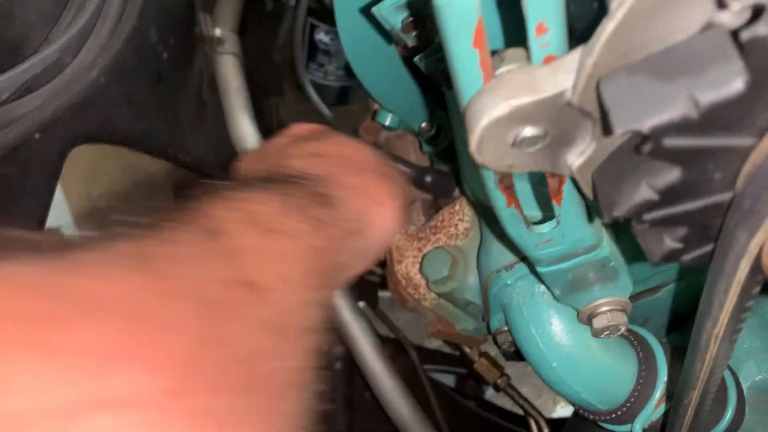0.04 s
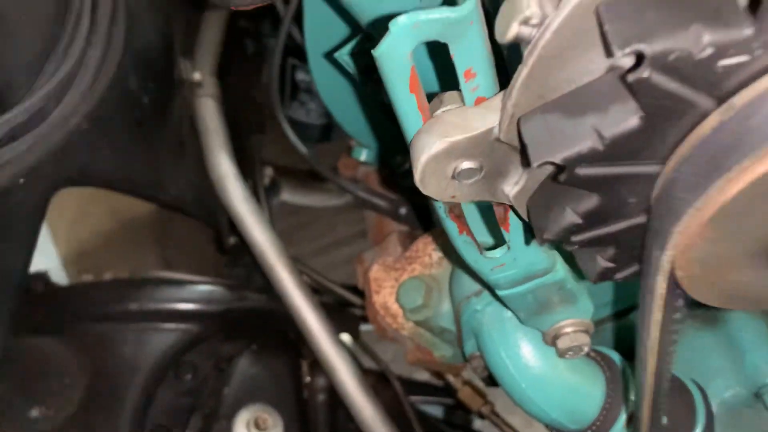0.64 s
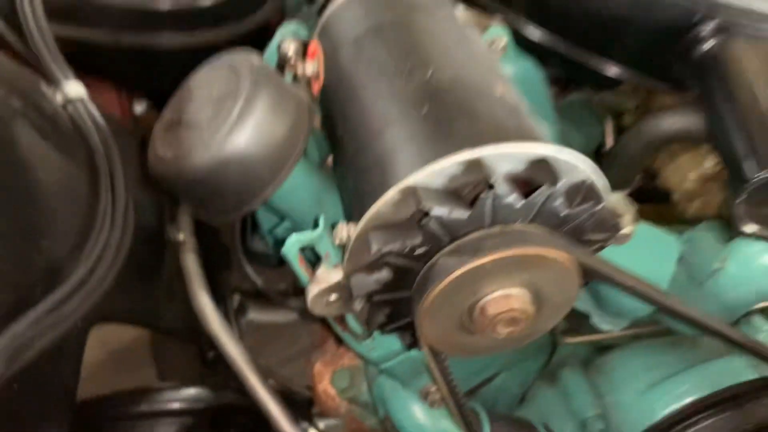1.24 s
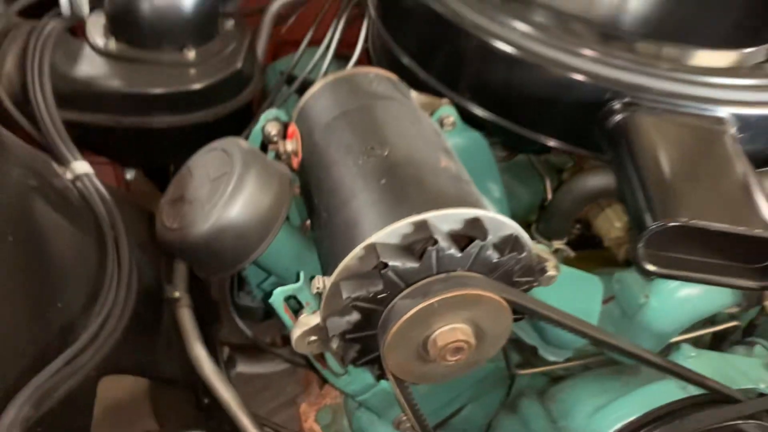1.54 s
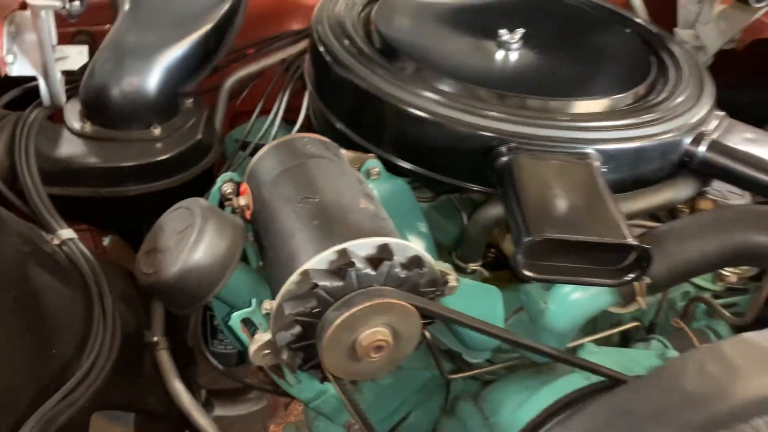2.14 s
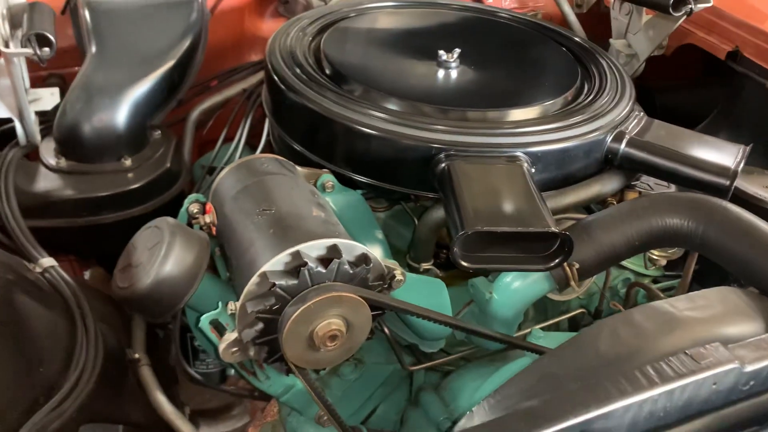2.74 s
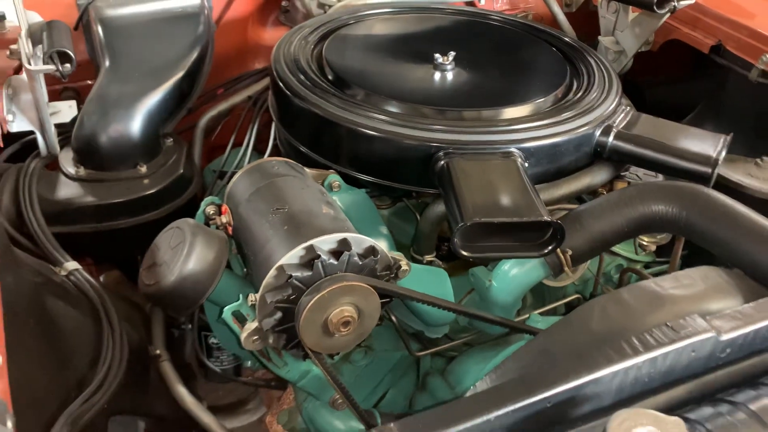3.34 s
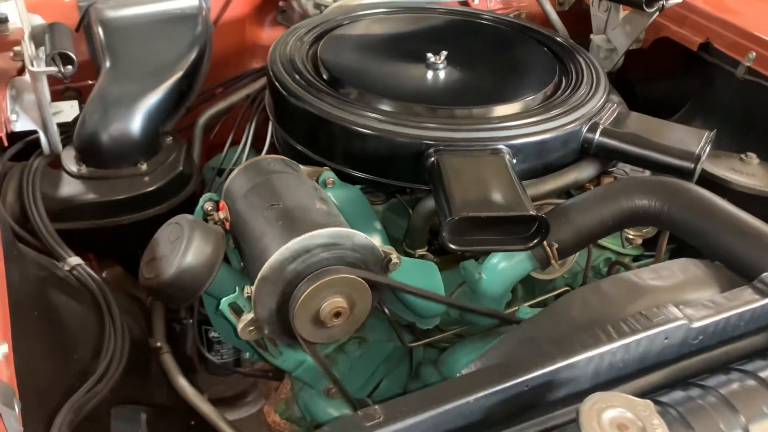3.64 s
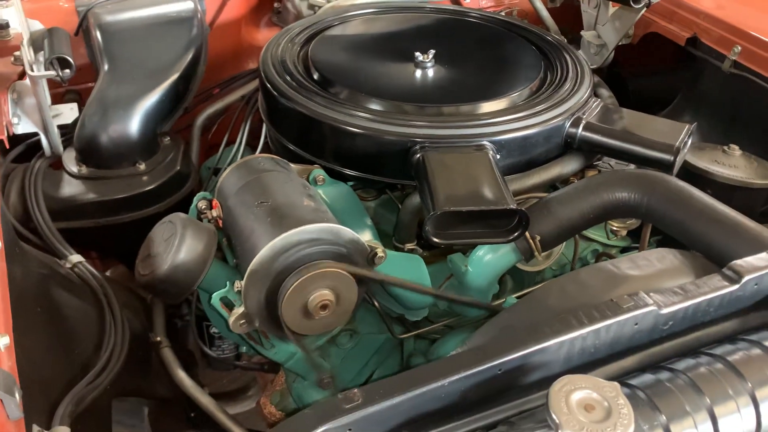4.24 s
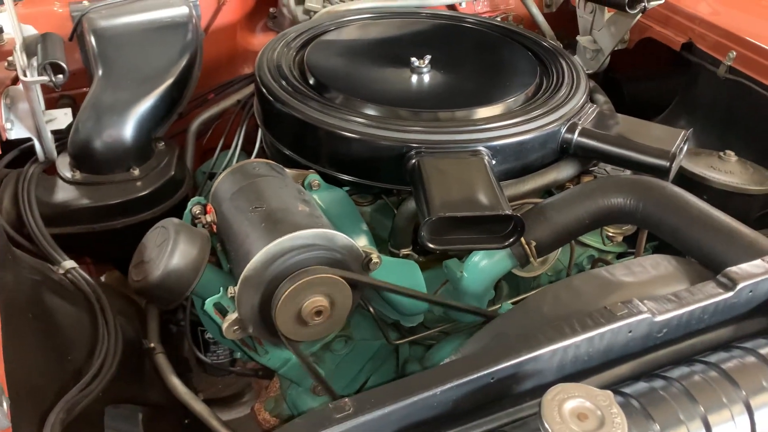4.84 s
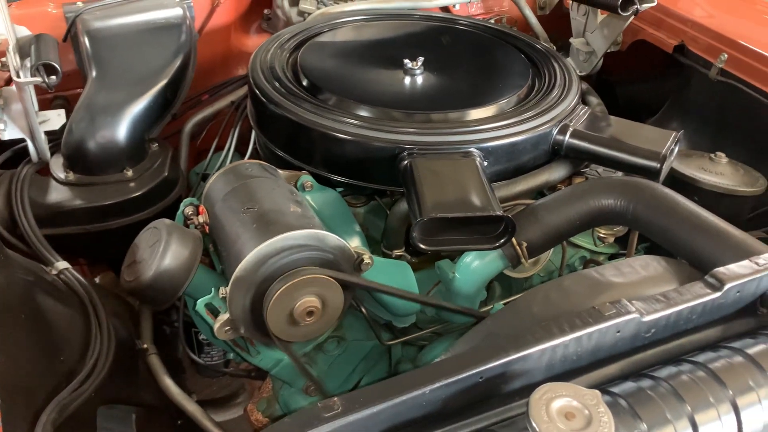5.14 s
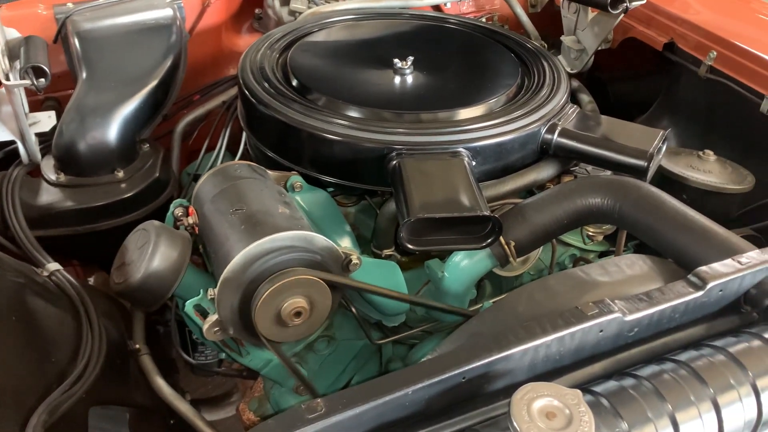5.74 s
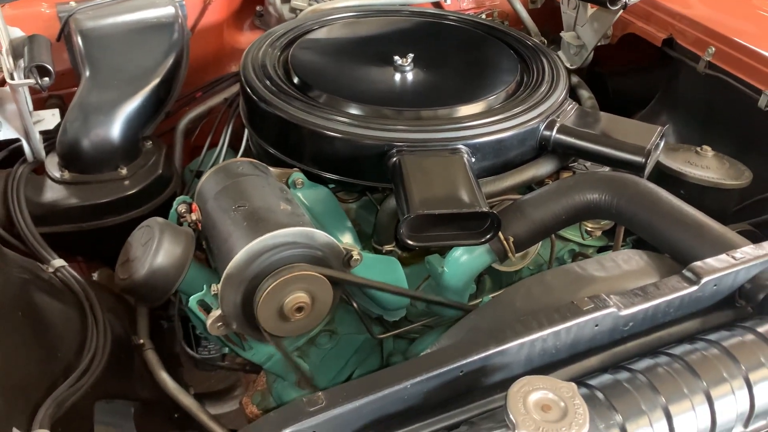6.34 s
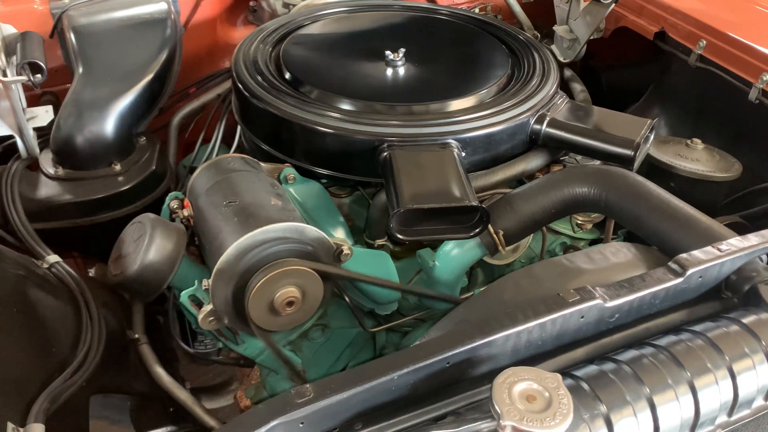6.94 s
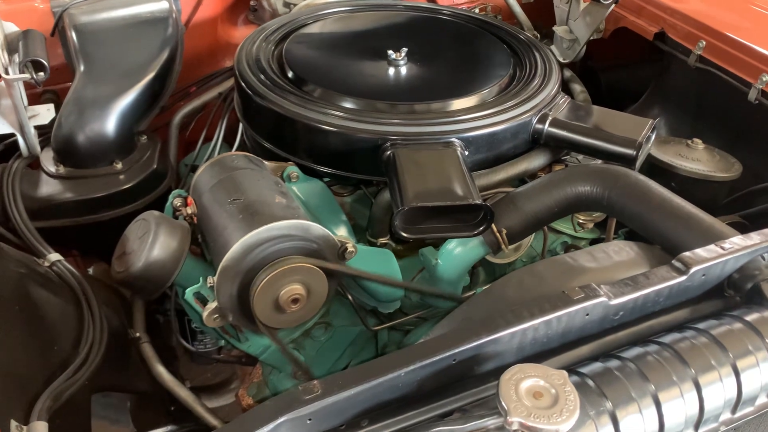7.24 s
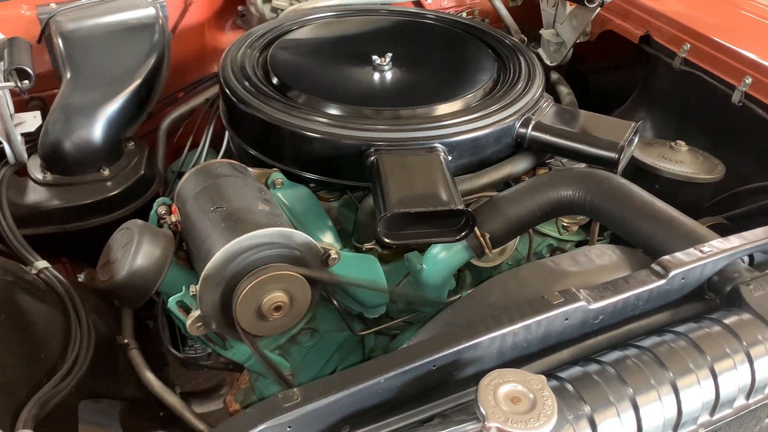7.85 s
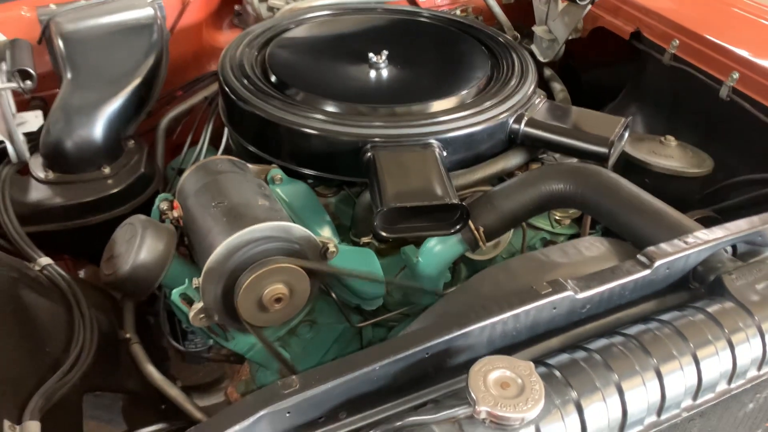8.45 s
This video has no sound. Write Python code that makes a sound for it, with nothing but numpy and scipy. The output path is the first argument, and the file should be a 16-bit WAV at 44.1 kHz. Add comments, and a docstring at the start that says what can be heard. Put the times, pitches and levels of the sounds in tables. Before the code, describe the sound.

Small metal clicks over a low hum, then a starter grinds and an old car engine fires up, idles and revs three times.

```python
"""A low garage hum, then clicks, knocks and faint squeaks from the door and controls of an old V8 car.
From above the open bonnet we hear the starter's teeth grind for under a second; the engine catches,
settles to a lumpy idle and is revved three times. One crankshaft and one throttle drive its layers:
firings shake the block, valve gear clatters, air hisses and snarls into the carburettor, and the
exhaust booms through the tailpipe. The throttle rods tap lightly during the idle."""
import sys
import numpy as np
from scipy import signal
from scipy.fft import rfft, irfft, next_fast_len
from scipy.io import wavfile
from scipy.ndimage import uniform_filter1d, map_coordinates

SR = 44100
rng = np.random.default_rng(int(sys.argv[2]) if len(sys.argv) > 2 else 0)


def pcm_store(signal):
    """Save signal as 16-bit PCM."""
    levels = np.round(np.clip(np.atleast_2d(signal), -1, 1) * 32767)
    wavfile.write(sys.argv[1], SR, levels.astype(np.int16).T)


N = 384111
TIME = np.arange(N) / SR

# room tone: rumble and air spectra, and the hum's tones (frequency [Hz], level [dB])
RUMBLE_EQ = [(12, -64), (20, -22), (36, -21.5), (59, -2), (75, -5), (91, -16.5), (134, -3.5), (166, -17.5),
             (315, -27.5), (400, -48), (520, -46.5), (880, -120)]
AIR_EQ = [(150, -21), (250, 0.5), (450, 4), (700, -2.5), (1100, -6.5), (1500, -9.5), (2000, -10.5),
          (2350, -11.5), (2900, -17), (4000, -19.5), (6000, -33.5), (16000, -29.5)]
HUM_TONES = [(59.2, -52), (134.6, -56)]
# reverb of the garage walls (frequency [Hz], t60 [s])
WALL_DECAY = [(100, 0.7), (500, 0.7), (2500, 0.3), (7000, 0.36), (15000, 0.18)]
# stereo width (frequency [Hz], side against mid [dB])
STEREO_WIDTH = [(60, -18.5), (200, -11.5), (380, -9.5), (700, -3), (2400, -1.5), (5000, -1.5),
                (8000, -25.5), (15000, -25)]
# two microphone ports hear the treble out of step (frequency [Hz], left's lead [rad])
PORT_PHASE = [(300, 0), (950, 0.73), (1900, -1.1), (3000, 2.17), (4200, 0.33), (5200, -3), (6700, 1),
              (8500, -4), (11000, -5.5), (13400, -10), (15500, -11.5)]

# cloth, seat and pedal scuffs (time [s], length [s], rub [dB], hollow body [dB])
SCUFF_CUES = [(-.2, 0.76, -76, -60.5), (0.31, 0.059, -57, -59), (0.556, 0.18, -58.5, -59),
              (1.965, 0.7, -66, -60), (2.35, 0.092, -49, -52), (2.39, 0.44, -63, -59),
              (3.113, 0.39, -60, -59), (3.374, 0.21, -52.5, -67)]
# metal contacts of latch, key, starter drive and linkage, and little puffs of intake air during the idle #
# (time [s], level [dB], body against snap [dB], rise [s], t60 [s])
CLICK_CUES = [(0.326, -48.5, -5, 0.014, 0.1), (1.945, -57, 8, 0.0073, 0.13),
              (1.998, -52.5, 4, 0.0099, 0.22), (2.081, -37, -24, 0.0017, 0.07),
              (2.099, -45, -15, .0017, 0.045), (2.278, -45.5, 1, 0.0017, 0.071),
              (2.32, -52.5, -3, 0.005, 0.15), (2.353, -33.5, -23, 0.0033, 0.09),
              (2.364, -23, -5, 0.0024, 0.086), (2.436, -47.5, 10.5, .002, 0.14),
              (2.553, -35, -1.5, 0.0013, 0.086), (2.701, -66, -2, .002, 0.068),
              (3.145, -48.5, 4, 0.0018, 0.21), (3.283, -67, -9, 0.0019, 0.052),
              (3.505, -19.5, -11, 0.019, 0.15), (4.023, -26.5, -8, 0.0079, 0.11),
              (4.12, -19, -16, 0.0041, 0.13), (5.2, -37.5, -10, 0.0069, 0.18), (5.335, -49, -23, .006, .12),
              (5.435, -36.5, -17, 0.009, 0.11)]
# dull bodywork knocks (time [s], level [dB], t60 [s])
KNOCK_CUES = [(0.336, -41, 0.047), (2.063, -44.5, 0.086), (2.433, -29, 0.086), (3.348, -37.5, 0.089),
              (3.386, -39.5, 0.023), (3.522, -30, 0.15)]
# struck parts, from metal ping to body thud (time [s], level [dB], frequency [Hz], t60 [s])
RING_CUES = [(0.338, -37.5, 1100, 0.1), (2.065, -45, 300, .15), (2.083, -38, 3855, 0.054),
             (2.436, -33, 640, 0.089), (2.556, -38, 290, 0.24), (2.556, -36.5, 6870, 0.042),
             (3.372, -23, 70, 0.085), (3.379, -38, 175, 0.065), (3.52, -24.5, 680, 0.22),
             (3.533, -21, 218, 0.2), (3.545, -28, 1005, .2), (3.55, -27, 131, 0.14), (3.586, -32, 242, .15),
             (4.118, -24.5, 522, 0.24), (4.12, -23.5, 4200, 0.28)]
# thin squeaks (time [s], length [s], frequency [Hz], level [dB])
SQUEAK_CUES = [(.8, 0.23, 2330, -70), (1.08, .1, 4000, -74), (1.35, .25, 2320, -70), (1.68, .1, 3980, -76),
               (1.737, 0.13, 2450, -68), (2.6, .15, 4180, -66), (2.728, 0.089, 2230, -60),
               (2.728, 0.14, 3300, -63), (2.76, .1, 4000, -72), (2.87, 0.095, 2220, -62),
               (2.92, .05, 2490, -62), (2.917, .09, 3330, -67), (3, 0.13, 2620, -58)]
# colour of scuff, click and knock (frequency [Hz], level [dB])
RUB_EQ = [(400, -13), (1200, 3), (2600, 4), (4000, -2.5), (6000, -8), (11000, -12), (16000, -11)]
SNAP_EQ = [(300, -22), (1000, 1.5), (2200, -2.5), (4000, 0.5), (7000, 1), (11000, -1.5), (16000, -3.5)]
KNOCK_EQ = [(80, 3.5), (200, 1), (290, 2.5), (430, 9), (600, 6), (900, -6.5), (1500, -10.5), (2500, -13),
            (8000, -41)]
# ring of latch and key, and of the body panels (frequency [Hz], width [Hz], level [dB])
LATCH_MODES = [(4480, 60, -2), (5835, 52, 2), (6260, 65, -2), (6830, 52, 7), (9900, 94, 7.5)]
PANEL_MODES = [(268.3, 6.4, 12.5), (429, 13.4, -3.5), (648, 28, -5.5), (880, 12, 2), (1034, 19, 5.5),
               (1242, 16, -2), (1800, 30, -3)]

# the starter labours at each compression (time [s], tooth rate [Hz], growl [dB], grind [dB])
CRANKING_CURVE = [(3.5, 183, -22.5, -28), (3.6, 235, -25.5, -31), (3.69, 270, -27, -23.5),
                  (3.745, 259, -26, -22), (3.81, 227, -27.5, -28), (3.895, 265, -28.5, -24),
                  (3.99, 219, -28, -29.5), (4.06, 290, -32.5, -21.5), (4.12, 280, -31.5, -25),
                  (4.2, 323, -27, -25.5), (4.29, 370, -34, -26), (4.33, 330, -39.5, -30)]
# colour of the gears' low growl and bright grind (frequency [Hz], level [dB])
GROWL_EQ = [(35, -25), (62, 6.5), (85, 0), (130, -5), (210, 4), (280, 2), (400, -18), (550, -6.5),
            (800, -8), (1100, -8.5), (2000, -32), (5000, -64)]
GRIND_EQ = [(600, -34), (1200, -3.5), (1900, -5), (2500, 3), (3100, 4), (4500, 0.5), (5400, -7), (7000, -7),
            (10000, -8.5), (16000, -17.5)]
# gear whine (multiple of the tooth rate [x], level [dB])
WHINE_ORDERS = [(1, 0.5), (1.5, -10), (2, -6), (2.5, 1.5), (3, 3.5), (3.5, -4), (4, -13), (5, -12), (6, -4),
                (7, -2.5), (9, -9), (10, -7), (13, -1), (16, 0)]
# ring of the starter's bell housing (frequency [Hz], width [Hz], level [dB])
HOUSING_MODES = [(282.7, 13, 8.5), (557.5, 16, 10.5), (690, 16, 8.5), (752, 24, 3), (811, 26, 8),
                 (888, 17, 8), (1420, 38, -2.5), (1567, 40, 2.5), (1854, 38, 15), (2300, 26, 2),
                 (2493, 19, 14), (2610, 40, 7), (2870, 45, -6), (3600, 66, 5), (4110, 97, 5),
                 (4690, 40, -1), (6240, 49, 1), (9980, 110, 15)]

# engine speed, four firings to a crank turn (time [s], firing rate [Hz])
SPEED_CURVE = [(4.25, 87.9), (4.48, 63.66), (4.58, 51.03), (4.8, 47.42), (5.13, 45.2), (5.35, 49.77),
               (5.99, 53.4), (6.12, 89.04), (6.23, 101.6), (6.39, 87.62), (6.61, 59.12), (6.75, 93.68),
               (6.89, 142.9), (7.0, 136.1), (7.17, 104.8), (7.34, 87.94), (7.69, 51.06), (7.8, 68.13),
               (7.96, 129.8), (8.07, 156.2), (8.15, 164.3), (8.3, 141.6), (8.47, 107.7), (8.71, 92.3)]
# gulps of mixture: two at the catch, a short surge, the pedal easing open, three blips (time [s],
# air rise [s], burn rise [s], length [s], fall [s], hiss [dB], roar [dB], snarl [dB], exhaust [dB])
THROTTLE_CUES = [(4.11, 0.065, 0.066, 0.2, 0.03, -20.5, -37, -50, -34),
                 (4.33, 0.042, 0.033, 0.073, 0.028, -25.5, -37, -43, -44),
                 (4.5, 0.05, 0.079, 0.13, 0.14, -40, -37.5, -49, -29.5),
                 (5.76, 0.05, 0.17, 0.36, 0.058, -34, -41, -36.5, -27.5),
                 (5.96, 0.046, 0.064, 0.13, 0.29, -26.5, -28, -31, -23.5),
                 (6.531, 0.2, 0.27, 0.31, 0.18, -25, -26, -24, -20),
                 (7.645, 0.29, .26, 0.42, 0.18, -23.5, -27.5, -26, -27.5)]
# colour of the block and the valve gear (frequency [Hz], level [dB])
BLOCK_EQ = [(100, -31), (170, 3), (230, 0.5), (310, 2), (360, -2.5), (420, 0), (620, -3.5), (850, -3.5),
            (1100, -17.5), (2000, -24), (4000, -52)]
CLATTER_EQ = [(500, -47), (900, 3.5), (1300, 0.5), (1900, -0.5), (2400, -2.5), (2900, -3.5), (3900, -4.5),
              (5200, -5.5), (8000, -4), (16000, -82)]
# pitched lines of the running engine (multiple of the firing rate [x], level [dB])
ENGINE_ORDERS = [(.75, -4), (1.5, 0), (2, -6), (2.5, -7.5), (3, -5.5), (3.5, -9), (4, -8), (4.5, -13),
                 (5, -9), (6, -9), (7, -17.5), (8, -13.5)]
# ring of the engine covers; pipe and air cleaner peaks that lift the orders gliding through them
# (frequency [Hz], width [Hz], level [dB])
COVER_MODES = [(268.5, 30, 1.5), (356.4, 22, 8.5), (513, 48, -2), (578, 44, 1), (680, 82, -5),
               (1186, 53, -2), (1361, 28, 0.5), (1500, 24, -34), (1773, 80, -1), (2090, 140, -2),
               (3890, 68, -2)]
PIPE_MODES = [(127, 49, 0), (231, 29, -1.5), (265.5, 20, -0.5), (357, 25.5, 8), (542, 22, 0),
              (625, 32, 1.5), (1160, 80, 6)]

# colour of the intake's hiss and snarl (frequency [Hz], level [dB])
HISS_EQ = [(1500, -8), (3500, -3.5), (5200, -3), (6800, 1), (8500, -1), (10500, 6), (12000, 2), (16000, -4)]
SNARL_EQ = [(300, -25), (550, -2.5), (1100, 4), (2300, -6), (3200, -4.5), (7000, -18)]
# whistles of the barely open throttle (time [s], length [s], level [dB])
WHISTLE_CUES = [(5.775, 0.11, -37), (5.84, 0.14, -35), (7.721, 0.074, -44)]
# the whistle's bands and the air cleaner's cavities (frequency [Hz], width [Hz], level [dB])
WHISTLE_MODES = [(1000, 42, 5), (2060, 170, -4), (2640, 120, 0.5), (3780, 150, 3), (5900, 70, 4),
                 (6800, 160, -5)]
AIR_CLEANER_MODES = [(618, 32, 7), (877, 38, 0), (1183, 32, 5.5), (1380, 44, 9), (1520, 28, 7.5),
                     (1740, 33, -5), (2330, 65, 3)]

# colour of the exhaust's boom and deep throb (frequency [Hz], level [dB])
BOOM_EQ = [(30, -23), (55, 0), (70, -7), (95, 6), (115, -5), (140, 0), (170, -19), (260, -18.5), (500, -71)]
THROB_EQ = [(20, -40), (34, -13), (44, 1), (54, 22), (66, -18), (110, -48)]
# exhaust lines that follow engine speed, throttle open or shut (multiple of the firing rate [x], level [dB])
LOPE_ORDERS = [(.5, -0.5), (.75, -13), (1, -5.5)]
# standing waves of the tailpipe (frequency [Hz], width [Hz], level [dB])
TAILPIPE_MODES = [(49.8, 10.7, -2.5), (91.6, 56, -1), (136, 18, -32)]
# heavy chuffs as the idle stumbles or a rev runs down (time [s], length [s], level [dB])
CHUFF_CUES = [(4.763, .11, -33), (5.278, 0.076, -32), (5.693, .06, -28), (7.281, 0.093, -25.5),
              (8.59, 0.087, -36)]

# taps of the throttle rods (time [s], level [dB], t60 [s])
TAP_CUES = [(4.859, -29, 0.065), (5.143, -31.5, 0.1), (5.733, -32.5, 0.037), (5.748, -36, 0.047)]
# colour of a tap (frequency [Hz], level [dB])
TAP_EQ = [(250, -7), (550, 4), (1000, -8), (1450, -6.5), (2000, -17), (8000, -37)]
# ring of the rods (frequency [Hz], width [Hz], level [dB])
ROD_MODES = [(532, 65, 5), (1030, 90, 5), (1340, 91, 3)]

ENGAGE_S, RELEASE_S = 3.5, 4.41  # starter pinion thrown in and out
RUN_DOWN_S, COAST_S, COAST_DB = 0.02, 0.29, -7.5  # the gears die fast, the armature whirs on
IDLE_HZ, FLYWHEEL_S = 48, 0.04  # firing rate at idle; the flywheel smooths changes of speed
BURN_LAG_S = 0.021  # from drawing the mixture in to hearing it burn
LOW_CUT_HZ, HIGH_CUT_HZ = 36, 16000


def amp(db):
    """Decibels to gain."""
    return 10 ** (np.asarray(db) / 20)


def unit(x):
    """Scale a mono signal, or the middle of a stereo pair, to rms 1."""
    return x / np.sqrt(np.mean(np.atleast_2d(x).mean(0) ** 2) + 1e-20)


def along(points, hz):
    """Read a curve of (frequency [Hz], value) points on a log axis."""
    f, v = np.transpose(points)
    return np.interp(np.log(hz + 1), np.log(f + 1), v)


def curves(rows):
    """One automation lane for each column after the time."""
    times, *columns = np.transpose(rows)
    return [np.interp(TIME, times, column) for column in columns]


def ramp(start, end):
    """Fade from 0 to 1 between two times."""
    return np.clip((TIME - start) / (end - start), 0, 1)


def swell(start, length):
    """Half-sine envelope."""
    return np.sin(np.pi * np.clip((TIME - start) / length, 0, 1))


def struck(start, rise, t60):
    """Envelope of one hit, peak 1."""
    age = np.clip(TIME - start, 0, 2)
    shape = (1 - np.exp(-age / rise)) ** 2 * amp(-60 * age / t60)
    return shape / (shape.max() + 1e-12)


def wobble(rate):
    """Smooth random modulation, rate knots a second."""
    return map_coordinates(rng.standard_normal(int(N * rate / SR) + 4), [TIME * rate])


def noise():
    """Two unrelated white noises."""
    return rng.standard_normal((2, N))


def filtered(x, response):
    """Pass x through a frequency response."""
    size = next_fast_len(N + SR // 2)
    return irfft(rfft(x, size) * response(np.fft.rfftfreq(size, 1 / SR)), size)[..., :N]


def resonances(modes, hz):
    """Response of a resonator bank (frequency [Hz], width [Hz], level [dB])."""
    return sum(amp(db) * 1j * hz * w / (c * c - hz * hz + 1j * hz * w) for c, w, db in modes)


def ringing(x, modes, direct=1):
    """The ring that x leaves in a resonator bank, plus a share of x itself."""
    return filtered(x, lambda f: direct + resonances(modes, f))


def voiced(pair, eq, modes=()):
    """Colour two excitations with EQ and resonances, then mix them as mid and side."""
    mid, side = filtered(pair, lambda f: amp(along(eq, f)) * (1 + resonances(modes, f)))
    side = filtered(side, lambda f: amp(along(STEREO_WIDTH, f)))
    return unit(np.array([mid + side, mid - side]))


def bay(pair, echo_db, t60):
    """Dense reflections between engine, wings and bonnet comb the sound into narrow peaks."""
    t = np.arange(SR // 8) / SR
    low_cut = signal.butter(2, 700, "high", fs=SR, output="sos")
    echoes = signal.sosfilt(low_cut, rng.standard_normal(len(t))) * amp(-60 * t / t60)
    wet = signal.fftconvolve(pair, echoes[None] / np.linalg.norm(echoes), axes=1)[:, :N]
    return unit(pair + amp(echo_db) * wet)


def strokes(cycles, scatter_db, uneven_db, decay, count=8):
    """One dying puff a cycle: count parts take turns, each with its own strength, no two hits alike."""
    index = cycles.astype(int)
    parts = rng.standard_normal(count)
    part_db = uneven_db * unit(parts - parts.mean())[index % count]
    stroke_db = scatter_db * rng.standard_normal(N)[index]
    return unit(amp(part_db + stroke_db) * np.exp(-(cycles % 1) / decay))


def blows(puffs):
    """The sharp attack of each puff."""
    return unit(np.maximum(np.diff(puffs, prepend=puffs[0]), 0))


def tones(cycles, orders, flutter_db, smear_rad):
    """Sines on multiples of a cycle, each fluttering in level and phase."""
    return sum(np.sqrt(2) * amp(db + flutter_db * wobble(14))
               * np.sin(2 * np.pi * k * cycles + smear_rad * wobble(20)) for k, db in orders)


def garage():
    """The bed: low rumble, a wavering hum and a little air."""
    hum = sum(amp(db + 1.9 * wobble(5)) * np.sin(2 * np.pi * hz * TIME + 1.7 * wobble(8.5))
              for hz, db in HUM_TONES)
    air = bay(voiced(noise(), AIR_EQ), echo_db=-8, t60=0.084)
    return amp(-45) * voiced(noise(), RUMBLE_EQ) + amp(-60.5) * air + hum


def handling():
    """Scuffs, clicks with a bright snap and a duller body, knocks, and the parts they set ringing."""
    snap = sum(amp(db) * struck(s, rise, t60) for s, db, _, rise, t60 in CLICK_CUES)
    body = sum(amp(db + body_db - 1.5) * struck(s, rise, 2 * t60)
               for s, db, body_db, rise, t60 in CLICK_CUES)
    body += sum(amp(db) * struck(s, 0.00088, t60) for s, db, t60 in KNOCK_CUES)
    rings = sum(amp(db) * struck(s, 0.0014, t60) * np.sin(2 * np.pi * hz * (TIME - s))
                for s, db, hz, t60 in RING_CUES)
    rub, hush = voiced(noise(), RUB_EQ), voiced(noise(), AIR_EQ)
    scuffs = sum(swell(s, length) * (amp(rub_db) * rub + amp(body_db) * hush)
                 for s, length, rub_db, body_db in SCUFF_CUES)
    bright = ringing(snap * bay(voiced(noise(), SNAP_EQ), echo_db=-1.5, t60=0.022), LATCH_MODES)
    hollow = ringing(body * bay(voiced(noise(), KNOCK_EQ), echo_db=-4.5, t60=0.064), PANEL_MODES)
    return amp(-1) * bright + amp(-1.5) * hollow + rings + scuffs


def walls(x):
    """The garage's reverb tail: each frequency dies at its own speed."""
    hz, t, bands = signal.stft(rng.standard_normal((2, SR // 2)), SR, nperseg=256)
    tail = signal.istft(bands * amp(-60 * t / along(WALL_DECAY, hz)[:, None]), SR, nperseg=256)[1]
    return signal.fftconvolve(x, tail / np.linalg.norm(tail[0]), axes=1)[:, :N]


def squeaks():
    """Short thin tones that swell, tremble and fade."""
    mix = np.zeros(N)
    for s, length, hz, db in SQUEAK_CUES:
        cycles = np.cumsum(hz * (1 + 0.004 * wobble(150))) / SR
        mix += amp(db + 2 * wobble(40.3)) * swell(s, length) * np.sin(2 * np.pi * cycles)
    return mix


def starter():
    """Pinion teeth strike the flywheel and ring the bell housing, surging between compressions."""
    tooth_hz, growl_db, grind_db = curves(CRANKING_CURVE)
    teeth = np.cumsum(tooth_hz * (1 + 0.04 * wobble(130) + 0.01 * wobble(22))) / SR
    contact = strokes(teeth, scatter_db=2, uneven_db=3, decay=0.5, count=9)
    strikes = blows(contact)
    growl = voiced(strikes * [[1], [0.3]] + 2 * noise(), GROWL_EQ, HOUSING_MODES)
    # each gear line flares as it glides through a resonance of the housing
    lines = tones(teeth, WHINE_ORDERS, flutter_db=3.5, smear_rad=0.62)
    whine = unit(ringing(lines, HOUSING_MODES, direct=0.61)) * (1 - ramp(4.07, 4.74))
    # the teeth scrape in bites, stirring now one group of resonances, now another
    bites = contact * amp(1.5 * wobble(90))
    scrape = sum(amp(2.8 * wobble(16)) * voiced(noise() * (0.7 + bites), GRIND_EQ, HOUSING_MODES[k::3])
                 for k in range(3))
    rasp = voiced(strikes * [[1], [0.6]], GRIND_EQ)
    grind = bay(unit(scrape) + amp(-4) * rasp, echo_db=5, t60=0.1)
    gears = amp(growl_db) * (amp(-2) * growl + amp(-4) * whine) + amp(grind_db) * grind
    # the dragged cylinders puff: a low tone that cuts in near the end of the cranking
    age = np.clip(TIME - ENGAGE_S, 0, 1)
    chug_gain = amp(-31) * ramp(4.2, 4.202) * np.exp(-age / 0.62)
    chug = chug_gain * np.sin(2 * np.pi * 59 * TIME + wobble(14))
    free_s = np.maximum(TIME - RELEASE_S, 0)
    run_down = np.maximum(np.exp(-free_s / RUN_DOWN_S), amp(COAST_DB) * np.exp(-free_s / COAST_S))
    return (gears + chug) * ramp(ENGAGE_S, ENGAGE_S + 0.049) * run_down


def effort(octaves, load, idle_db, db_per_octave):
    """Fader of an engine layer: one part grows with speed, the other comes from the load."""
    return np.hypot(amp(idle_db + db_per_octave * octaves), load)


def machinery(firings, octaves, roar, snarl):
    """Each firing shakes the block; valve gear rattles twice as often, over the rush of the fan."""
    puffs = strokes(firings, scatter_db=1.5, uneven_db=3, decay=0.55)
    block = voiced(noise() * (1.23 + puffs) + 0.35 * blows(puffs), BLOCK_EQ, COVER_MODES)
    lines = tones(firings, ENGINE_ORDERS, flutter_db=2, smear_rad=0.15)
    drone = unit(ringing(lines, PIPE_MODES, direct=0.33))
    body = unit(bay(block, echo_db=-5, t60=0.12) + 1.3 * drone)
    body *= amp(1.2 * wobble(30) / 2 ** octaves)  # the burn is lumpiest at idle
    valves = strokes(2 * firings, scatter_db=-5, uneven_db=10.5, decay=0.94, count=16)
    rattle = noise() * (2 + 0.5 * valves)
    clatter = bay(voiced(rattle, CLATTER_EQ, COVER_MODES), echo_db=-5, t60=0.067)
    body_gain = effort(octaves, amp(2) * roar, idle_db=-40.5, db_per_octave=9.5)
    clatter_gain = effort(octaves, amp(-1) * snarl, idle_db=-45, db_per_octave=10.5)
    return (body_gain * body + clatter_gain * clatter) * ramp(3.73, 4.6)


def throttle():
    """Envelopes of air draw, roar, snarl and exhaust push: the air leads and the burn follows."""
    def gulp(age, rise, length, fall, bend):
        return np.clip(age / rise, 0, 1) ** bend * np.exp(-np.maximum(age - length, 0) / fall)
    draw, roar, snarl, push = np.zeros((4, N))
    for s, air_rise, burn_rise, length, fall, hiss_db, roar_db, snarl_db, push_db in THROTTLE_CUES:
        draw += amp(hiss_db) * gulp(TIME - s, air_rise, length, fall, bend=0.86)
        burn = gulp(TIME - s - BURN_LAG_S, burn_rise, length, fall, bend=1.2)
        roar += amp(roar_db) * burn
        snarl += amp(snarl_db) * burn
        push += amp(push_db) * burn
    push += sum(amp(db) * swell(s, length) for s, length, db in CHUFF_CUES)
    return draw, roar, snarl, push


def intake(firings, octaves, draw):
    """Air hisses past the throttle, tugged by each intake stroke, and whistles in the narrow gap."""
    tugs = strokes(firings, scatter_db=4, uneven_db=4, decay=1)
    hiss = bay(voiced(noise() * (1.74 + 0.6 * tugs), HISS_EQ), echo_db=-5.5, t60=0.07)
    whistle = unit(ringing(noise(), WHISTLE_MODES, direct=0))
    whistle_gain = sum(amp(db) * swell(s, length) for s, length, db in WHISTLE_CUES)
    hiss_gain = effort(octaves, amp(3) * draw, idle_db=-40.5, db_per_octave=7) * amp(0.52 * wobble(30))
    return hiss_gain * hiss * ramp(4.1, 4.13) + whistle_gain * whistle


def air_cleaner(firings, snarl):
    """Under throttle each intake stroke barks through the cavities of the air cleaner."""
    barks = strokes(firings, scatter_db=2.5, uneven_db=3, decay=0.45)
    drive = noise() * barks + 0.6 * blows(barks)
    return amp(-4) * snarl * bay(voiced(drive, SNARL_EQ, AIR_CLEANER_MODES), echo_db=-4.5, t60=0.049)


def exhaust(firings, octaves, push):
    """The tailpipe booms on one note under throttle and lopes on half orders that follow engine speed alone."""
    burble = amp(3.5 * wobble(55))  # no two firings are alike
    lope = 1 + 0.3 * np.sin(np.pi * firings / 2)  # the two banks pull unequally over a crank turn
    pulling = push * burble * lope * np.sqrt(2) * np.sin(2 * np.pi * firings)
    loping = amp(-38 + 4 * octaves) * tones(firings, LOPE_ORDERS, flutter_db=4.5, smear_rad=0.58)
    # the notes swell as they glide through the pipe's standing waves
    notes = filtered(pulling + loping, lambda f: 0.053 + np.abs(resonances(TAILPIPE_MODES, f)))
    # ragged pulses from the two banks fill in the low end
    pulses = blows(strokes(firings, scatter_db=6, uneven_db=7, decay=0.3))
    pulses -= uniform_filter1d(pulses, SR // 20)
    boom_gain = effort(octaves, amp(-7.5) * push, idle_db=-38, db_per_octave=7.5)
    boom = boom_gain * voiced(pulses + 1.76 * noise(), BOOM_EQ)
    throb = amp(-40.5) * voiced(noise() + 0.3 * pulses, THROB_EQ)
    return (notes + boom + throb) * ramp(4.16, 4.5)


def linkage():
    """Light taps of the throttle rods, each with a short hollow ring."""
    taps = sum(amp(db) * struck(s, 0.0018, t60) for s, db, t60 in TAP_CUES)
    return taps * bay(voiced(noise(), TAP_EQ, ROD_MODES), echo_db=3, t60=0.041)


def scene():
    """Engine layers locked to one crankshaft, with starter, foley and room tone."""
    firing_hz = uniform_filter1d(curves(SPEED_CURVE)[0], int(FLYWHEEL_S * SR))
    firings = np.cumsum(firing_hz * (1 + 0.007 * wobble(20))) / SR
    octaves = np.log2(firing_hz / IDLE_HZ)  # speed above idle
    draw, roar, snarl, push = throttle()
    engine = exhaust(firings, octaves, push) + machinery(firings, octaves, roar, snarl)
    engine += air_cleaner(firings, snarl) + intake(firings, octaves, draw)
    foley = handling() + linkage() + squeaks()
    return engine + starter() + foley + amp(-13) * walls(foley) + garage()


def record(dry):
    """Two microphone ports shift the treble's phase apart and trim the deepest bass and the very top."""
    def response(hz):
        ports = np.exp(0.5j * along(PORT_PHASE, hz) * np.array([[1], [-1]]))
        low_cut = 1 - 1 / (1 + (hz / LOW_CUT_HZ) ** 12)
        return ports * low_cut / (1 + (hz / HIGH_CUT_HZ) ** 200)
    return filtered(dry, response)


dry = scene()
out = record(dry)
pcm_store(out)
```